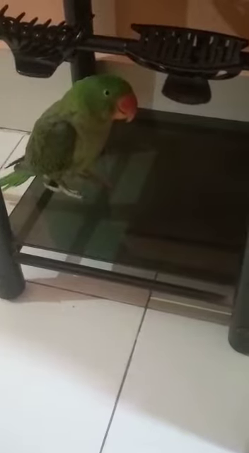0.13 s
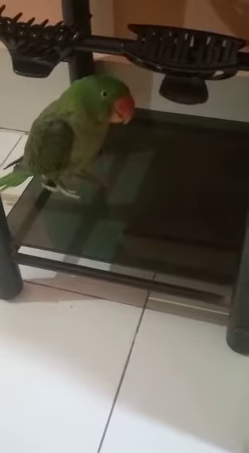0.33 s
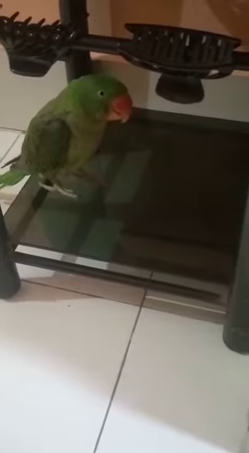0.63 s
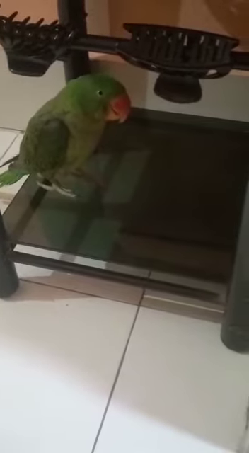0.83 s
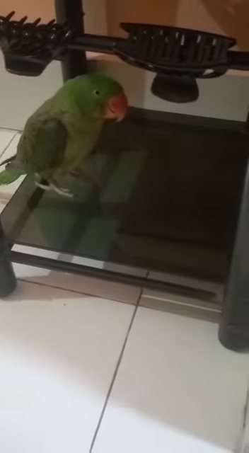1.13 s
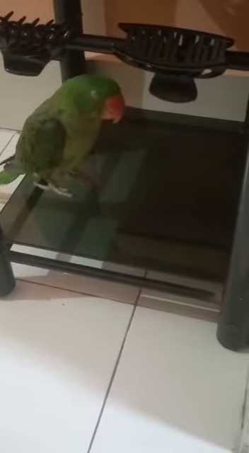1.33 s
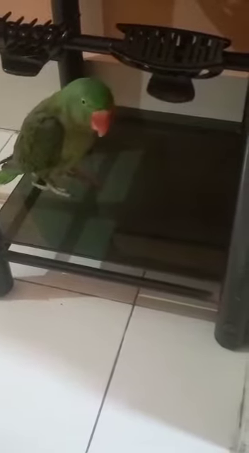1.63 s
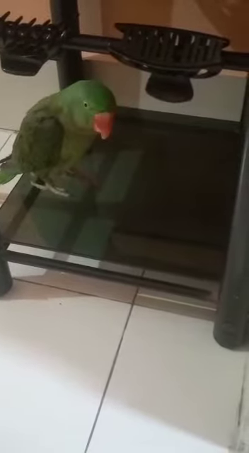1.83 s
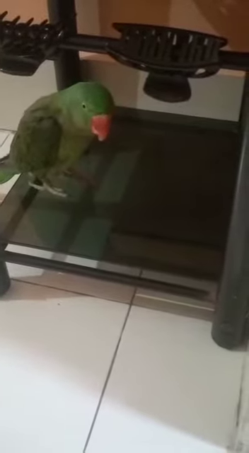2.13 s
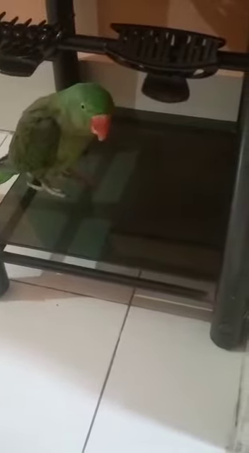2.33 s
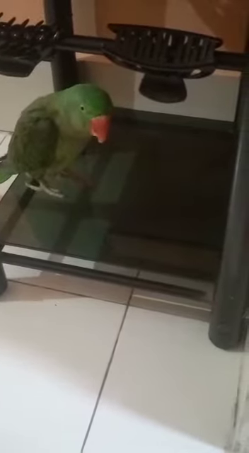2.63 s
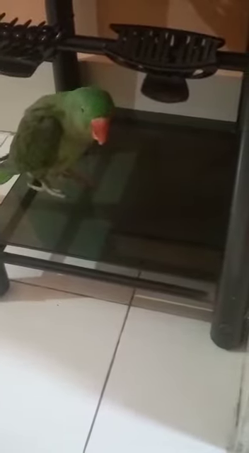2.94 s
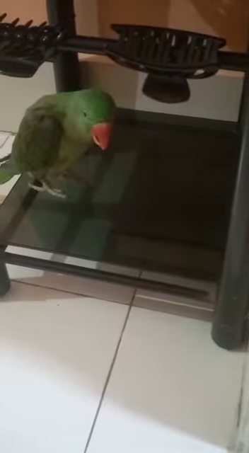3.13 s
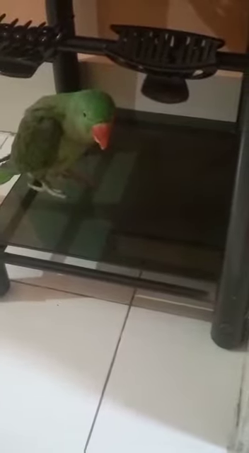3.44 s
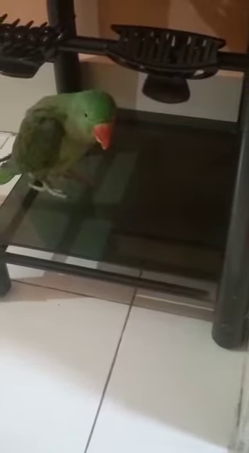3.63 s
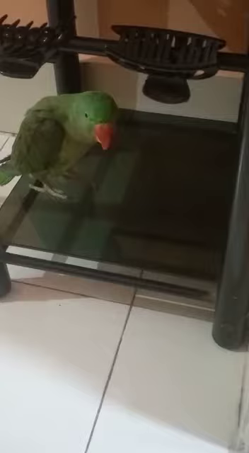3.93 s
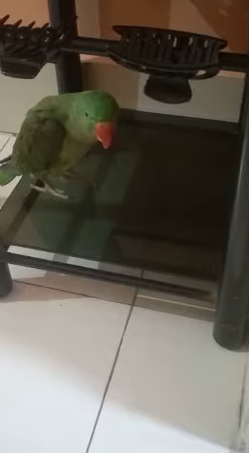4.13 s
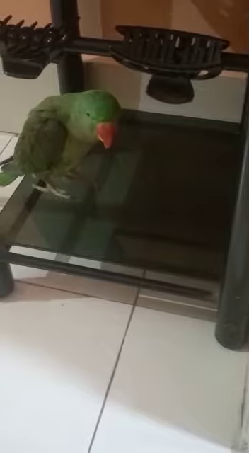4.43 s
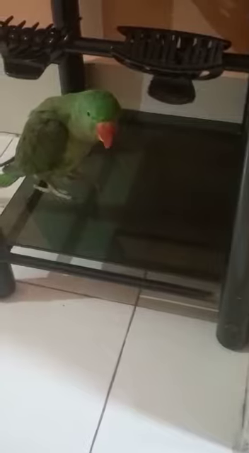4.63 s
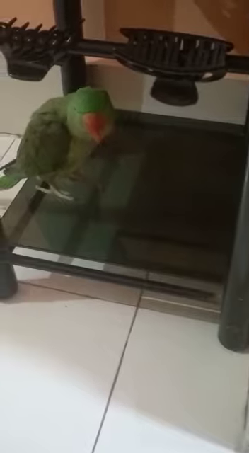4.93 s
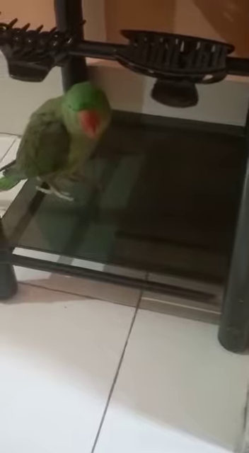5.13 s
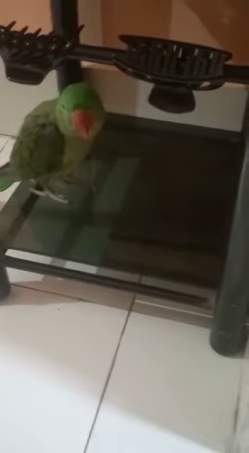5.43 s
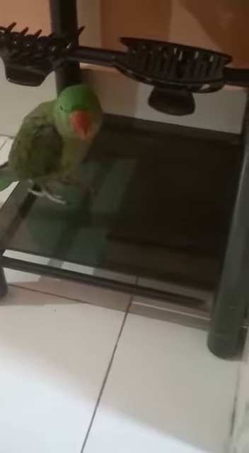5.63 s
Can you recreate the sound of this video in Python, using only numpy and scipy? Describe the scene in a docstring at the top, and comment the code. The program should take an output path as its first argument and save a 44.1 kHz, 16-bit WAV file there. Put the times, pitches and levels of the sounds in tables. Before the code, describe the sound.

A pet parakeet gives two runs of four short, harsh screeches in a small echoing tiled room, then goes quiet over faint hum.

```python
"""A small tiled room: a parakeet gives two runs of four screeches, a metre or two from a handheld phone.
Each screech is a stack of overtones that shoots up, wavers and slides down; echoes and a noise wash smear it.
Under it, sine tones make an appliance hum and faint insects outside, and filtered noise makes room air
and traffic rumble. Near the end claws tick as short rings and feathers rustle as shaped noise."""
import sys
import numpy as np
from scipy import signal
from scipy.fft import rfft, irfft, next_fast_len
from scipy.io import wavfile
from scipy.ndimage import uniform_filter1d

SR = 44100
rng = np.random.default_rng(int(sys.argv[2]) if len(sys.argv) > 2 else 0)


def pcm_store(signal):
    """Save signal as 16-bit PCM."""
    levels = np.round(np.clip(np.atleast_2d(signal), -1, 1) * 32767)
    wavfile.write(sys.argv[1], SR, levels.astype(np.int16).T)


N = 255691
TIME = np.arange(N) / SR


def undb(db):
    """Turns decibels into an amplitude factor."""
    return 10 ** (np.asarray(db) / 20)


def unit(x):
    """Scales a signal to rms 1."""
    return x / np.sqrt(np.mean(x ** 2))


def on_log(table, hz, column=1):
    """Reads a table by straight lines on a log-frequency axis."""
    table = np.array(table)
    return np.interp(np.log(np.maximum(hz, 1)), np.log(table[:, 0]), table[:, column])


def shaped(gain, count=N):
    """Noise whose spectrum follows gain(hz)."""
    size = next_fast_len(count)
    spectrum = rfft(rng.standard_normal(size))
    return irfft(spectrum * gain(np.fft.rfftfreq(size, 1 / SR)), size)[:count]


def band(hz, width_hz, count=N):
    """Noise in a bell-shaped band, rms 1; centred on 0 Hz it is a slow random control signal."""
    return unit(shaped(lambda f: np.exp(-.5 * ((f - hz) / width_hz) ** 2), count=count))


# Colour of throat, beak and microphone: [f/Hz, level/dB]
THROAT_COLOUR = [(400, -30), (620, -8), (780, -9), (1000, -15), (1300, -4), (1800, 0), (2300, 1.5),
                 (2900, 1.5), (3500, -4), (4200, -4.5), (4700, -8), (5300, 3), (6050, -9), (6600, -7),
                 (7400, -13), (8200, -24), (10500, -32), (13000, -21.5), (15500, -28.5)]
# Roughness of the voice [0-1] at start, climb, top, held note, slide and end
ROUGHNESS = (.08, .18, .1, .13, .09, .15)
START_HZ = 590
LEAP_S = .011  # from the end of the climb to the top
SAG_S, SNAP_S = .021, .005  # longest drop from the top to the held note: plain, after a crack
CRACK_AFTER_S = 0.0026  # from reaching the top to the crack
ATTACK_DB = -11.5  # the voice starts this much under its climb level
BRIGHTEN_DB = 2  # per octave, from the slide to the end
SECOND_DB = -0.5  # extra trim on the second harmonic


def screech(start_s, open_s, top_s, settled_s, slide_s, end_s, leap_hz, top_hz, settled_hz, slide_hz, end_hz,
            crack_db, climb_db, top_db, settled_db, slide_db, end_db,
            climb_fall, top_fall, settled_fall, slide_fall):
    """The syrinx drives a stack of overtones; when rough, its pitch and strength shake."""
    t = np.arange(int(start_s * SR), int(end_s * SR)) / SR
    count = len(t)
    leave_s = max(top_s, settled_s - (SNAP_S if crack_db else SAG_S))
    pitch_times = [start_s, top_s - LEAP_S, top_s, leave_s, settled_s, slide_s, end_s]
    pitches = [START_HZ, leap_hz, top_hz, top_hz, settled_hz, slide_hz, end_hz]
    hz = uniform_filter1d(np.interp(t, pitch_times, pitches), size=200)

    # level and colour reach their top values during the leap, ahead of the pitch
    stages = [start_s, open_s, top_s - 0.61 * LEAP_S, settled_s, slide_s, end_s]
    db = np.interp(t, stages, [climb_db + ATTACK_DB, climb_db, top_db, settled_db, slide_db, end_db])
    falls = [climb_fall, climb_fall, top_fall, settled_fall, slide_fall, slide_fall - BRIGHTEN_DB]
    fall_db = np.interp(t, stages, falls)
    rough = np.interp(t, stages, ROUGHNESS)

    # a slight tremor blurs the high overtones most
    tremor = (.005 + .07 * rough) * band(0, 400, count=count)
    phase = 2 * np.pi * np.cumsum(hz * (1 + tremor)) / SR
    tone = 0
    for k in range(1, 17):
        colour_db = on_log(THROAT_COLOUR, k * hz) - fall_db * np.log2(k) + (SECOND_DB if k == 2 else 0)
        colour = undb(colour_db) * (k * hz < .45 * SR)
        # each overtone flickers on its own, the higher ones more
        flicker = undb(min(1.5 * (k - 1), 4) * band(0, 70, count=count))
        # the top overtones fray into noise
        fray = np.clip(.3 * (k * hz / 1000 - 5), 0, 1.1) * band(0, 350, count=count)
        tone = tone + flicker * colour * np.sin(k * phase + k ** 2 + fray)
    tone = tone * (1 + rough * band(0, 210, count=count))

    # turbulent air in the throat
    breath = unit(shaped(lambda f: undb(on_log(THROAT_COLOUR, f)), count=count)) * undb(-27 + 24 * rough)
    # some screeches crack at the top: the voice drops until the held note
    cracked = (t > top_s + CRACK_AFTER_S) & (t < settled_s - SNAP_S / 2)
    crack = undb(uniform_filter1d(crack_db * cracked, size=150, output=float))
    edges = np.clip(np.minimum(t - t[0], t[-1] - t) / .008, 0, 1) ** 2
    return (tone * crack + breath * np.sqrt(crack)) * undb(db) * edges


# Ring of the hard walls: [f/Hz, t60/s, wash level/dB]
ROOM_RING = [(504.5, 0.49, 4), (1049.6, .45, 6), (1500, .45, -1), (2100, 0.43, 1), (3300, 0.36, 0),
             (4300, .4, 0.5), (5700, 0.38, -3), (8600, .36, 2), (14100, .3, 1.5)]
# Microphone ports, echoes off shelf, floor and table legs:
# [lag/samples, direct level/dB, [(echo t/s, level/dB against the direct sound)]]
MIC_PORTS = [(0, 0.64, [(.00097, -5), (.0031, -3), (.0052, -12.5), (.0083, -19)]), (6, -4, [(.00076, 2.5),
             (.0027, -21.5), (.0058, -24.5), (.0074, -4.5)])]


def room(x):
    """Direct sound, a few near echoes, then a dense wash that differs at the two microphone ports."""
    t = np.arange(SR // 2) / SR
    out = []
    for lag, direct_db, echoes in MIC_PORTS:
        response = np.zeros(len(t))
        for hz in 350 * 2 ** np.arange(0, 5.6, .5):  # half-octave steps
            decay = np.exp(-np.log(1000) * t / on_log(ROOM_RING, hz))
            wash = shaped(lambda f: np.exp(-2 * (np.log2((f + 1) / hz) / .5) ** 2), count=len(t))
            level = undb(on_log(ROOM_RING, hz, column=2))
            response += wash * decay / np.sqrt(np.sum(decay ** 2)) * level
        response *= 1 - np.exp(-t / 0.0023)  # the wash builds up
        for s, db in [(0.00055, 0.0061)] + echoes:  # direct sound first
            response[int(lag + s * SR)] += undb(direct_db + db)
        out.append(signal.fftconvolve(x, response)[:len(x)])
    return np.array(out)


# Each screech climbs, leaps to its top, settles on a held note and slides down:
# [start t/s, voice open t/s, top t/s, settled t/s, slide t/s, end t/s,
#  before the leap f/Hz, top f/Hz, settled f/Hz, slide f/Hz, end f/Hz, crack level/dB,
#  climb level/dB, top level/dB, settled level/dB, slide level/dB, end level/dB,
#  fall of the overtones in dB per octave: climb, top, settled, slide]
SCREECH_RUNS = [ (-.045, -.033, -.004, .032, .072, .117, 1500, 2630, 2310, 2410, 1380, 0, -31.5, -28.5, -32, -32, -29.5, -0.5, 5, 2, 4),
                (.244, .265, .278, .31, .352, .402, 1420, 2780, 2330, 2300, 1330, 0, -26, -35.5, -27, -25, -35.5, 3, -1.5, 5.5, 4.5),
                (.533, .543, .57, .597, .632, .683, 1650, 2760, 2090, 2090, 1470, -14, -30.5, -25.5, -27, -25, -31.5, 4, 4.5, 1.5, 2.5),
                (.833, .849, .867, .905, .93, .989, 1600, 2830, 2240, 2240, 1420, -20, -23, -33.5, -23.5, -23, -34.5, 4.5, -1.5, 12.5, 2),
                (2.97, 2.981, 3.005, 3.072, 3.1, 3.133, 1430, 2480, 2330, 2050, 1310, -26, -26.5, -30.5, -25, -19, -35.5, 12, 3.5, 6.5, 1),
                (3.279, 3.3, 3.315, 3.34, 3.376, 3.45, 1800, 2460, 2180, 2050, 1240, 0, -28.5, -20, -26, -20.5, -35, 5, 2, 16.5, 4.5),
                (3.586, 3.606, 3.624, 3.655, 3.685, 3.76, 1700, 2420, 1930, 1930, 1320, 0, -25.5, -25, -25, -27, -43, 11.5, -0.5, 4, 3),
                (3.89, 3.905, 3.935, 3.957, 3.99, 4.036, 1460, 2240, 1780, 1770, 1370, 0, -28, -22.5, -28.5, -29.5, -38, 7.5, 4.5, 2, 3)]
LEAD_S = .06  # the first screech is under way before time zero


def parakeet():
    """All screeches on one line, heard through the room."""
    lead = int(LEAD_S * SR)
    out = np.zeros(N + lead)
    for row in SCREECH_RUNS:
        sound = screech(*row)
        start = lead + int(row[0] * SR)
        out[start:start + len(sound)] += sound
    return room(out)[:, lead:]


# Stereo width of noise: [f/Hz, left-right likeness 0-1]
STEREO_LIKENESS = [(60, 1), (130, 0.8), (290, 0.62), (640, 0.8), (1410, 0.31), (3100, 0), (6820, 0),
                   (15000, 0)]
# Stereo lean of noise: [f/Hz, left minus right level/dB]
STEREO_LEAN = [(60, 0.5), (110, -0.5), (200, -3), (380, -4), (700, 4), (1290, -1), (2380, 0.5), (4400, 2),
               (8120, 3.5), (15000, -1.5)]


def stereo_noise(gain):
    """Shaped noise, rms 1 over both sides: mid and side set how alike they are, then each band leans."""
    like = lambda f: np.clip(on_log(STEREO_LIKENESS, f), 0, 1)
    mid = shaped(lambda f: gain(f) * np.sqrt(1 + like(f)))
    side = shaped(lambda f: gain(f) * np.sqrt(1 - like(f)))
    size = 2 * next_fast_len(N // 2 + 1)
    lean_db = np.outer([.5, -.5], on_log(STEREO_LEAN, np.fft.rfftfreq(size, 1 / SR)))
    pair = np.array([mid + side, mid - side])
    return unit(irfft(rfft(pair, size) * undb(lean_db), size)[:, :N])


# Spectrum shape of air and rumble: [f/Hz, relative level/dB per Hz]
AIR_COLOUR = [(15, -77), (25, -35), (91, -12), (169, -14.5), (240, -15.5), (314, -21.5), (349, -13),
              (422, -30), (496, -23.5), (615, -37.5), (3730, -44.5), (4760, -43), (8370, -41.5),
              (9570, -45), (15500, -45.5)]
# Low rumble, 70 to 160 Hz, before its quick swells: [t/s, level/dB]
RUMBLE_LEVEL = [(0.0, -62), (0.48, -60), (0.51, -78), (0.61, -58.5), (1.47, -61.5), (1.89, -72), (2.2, -55),
                (2.52, -66), (3.81, -62.5), (3.84, -74.5), (4.34, -67.5), (5.8, -71)]
# Deepest part of the rumble, 42 to 70 Hz: [t/s, level/dB]
DEEP_LEVEL = [(0.0, -71), (1.1, -73), (1.26, -77.5), (1.97, -80.5), (2.18, -77), (4.23, -80), (4.52, -72.5),
              (5.25, -76), (5.8, -84)]
# Hum lines and thin insect-like tones: [f/Hz, wander/Hz rms, mean level/dB rms, left minus right level/dB]
HUM_AND_INSECTS = [(193.8, 6, -76, 0), (344.5, .5, -72, -7), (393, .5, -74, -7), (498, 4, -90, 0),
                   (4867, 12, -94, 4), (6385, 25, -98, 4), (7569, 15, -99, 4), (7811, 15, -98, 4),
                   (8107, 10, -97, 4), (8204, 10, -97, 4), (8549, 5, -89, 4), (9044, 8, -98, 4)]
AIR_DB = -68
RUMBLE_HZ, RUMBLE_WIDTH_HZ, RUMBLE_PEAK_DB = 90, 6, 6
RUMBLE_SWELL_DB, RUMBLE_SWELL_HZ = 0.5, 6.6  # quicker random swells


def background():
    """Steady room air and swelling low noise, with hum and insect sines that waver in pitch and level."""
    colour = lambda f: on_log(AIR_COLOUR, f)
    air = stereo_noise(lambda f: undb(colour(f)) * (f > 160)) * undb(AIR_DB)
    boom = lambda f: RUMBLE_PEAK_DB * np.exp(-.5 * ((f - RUMBLE_HZ) / RUMBLE_WIDTH_HZ) ** 2)
    rumble = stereo_noise(lambda f: undb(colour(f) + boom(f)) * (f <= 160) * (f > 70))
    rumble_db = np.interp(TIME, *np.transpose(RUMBLE_LEVEL)) + RUMBLE_SWELL_DB * band(0, RUMBLE_SWELL_HZ)
    deep = stereo_noise(lambda f: undb(colour(f)) * (f <= 70) * (f > 42))
    deep_db = np.interp(TIME, *np.transpose(DEEP_LEVEL))
    out = air + deep * undb(deep_db) + rumble * undb(rumble_db)

    for hz, wander_hz, mean_db, pan_db in HUM_AND_INSECTS:
        waver = np.cumsum(wander_hz * band(0, 12)) / SR
        drift = np.interp(TIME, np.linspace(0, N / SR, 40), rng.standard_normal(40))
        db = mean_db + 1.5 * drift
        for side, sign in enumerate((1, -1)):
            # the two ports hear each tone slightly out of step
            tone = np.sin(2 * np.pi * (hz * TIME + waver) + sign * hz / 700)
            out[side] += np.sqrt(2) * undb(db + sign * pan_db / 2) * tone
    return out


# Claw ticks: [t/s, level/dB, f/Hz, t60/s]
CLAW_TICKS = [(4.555, -62, 1700, .004), (4.622, -64, 1900, .005), (5.066, -54, 355, 0.018),
              (5.548, -53, 378, 0.024), (5.654, -36, 2400, 0.0038)]
# Feather rustle: [t/s, level/dB]
RUSTLE_LEVEL = [(5.66, -80), (5.674, -67), (5.73, -66.5), (5.79, -69), (5.798, -72)]
# Spectrum shape of the feathers: [f/Hz, relative level/dB per Hz]
FEATHER_COLOUR = [(710, -51), (1200, -12.5), (2570, -0.5), (4400, -13), (5980, -4.5), (7310, -9.5),
                  (13600, -26.5), (15000, -22)]


def small_noises():
    """Claws tick on the shelf as dying rings, then feathers rustle as noise with a random flutter."""
    out = np.zeros((2, N))
    for s, db, hz, t60 in CLAW_TICKS:
        t = np.maximum(TIME - s, 0)
        # a short ring with an overtone a fifth above
        ring = np.sin(2 * np.pi * hz * t) + 0.24 * np.sin(2 * np.pi * 1.5 * hz * t)
        touch = 1 - np.exp(-3 * hz * t)  # the contact lasts part of a cycle
        out += undb(db) * touch * ring * np.exp(-np.log(1000) * t / t60)
    s, db = np.transpose(RUSTLE_LEVEL)
    feathers = stereo_noise(lambda f: undb(on_log(FEATHER_COLOUR, f))) * undb(1.5 * band(0, 43))
    return out + feathers * undb(np.interp(TIME, s, db, left=-140))


def scene():
    """The bird, its small noises and the background together."""
    return parakeet() + small_noises() + background()


TOP_HZ = 15700


def record(dry):
    """The phone cuts the top with a steep low-pass."""
    return signal.sosfilt(signal.ellip(10, .2, 80, TOP_HZ, fs=SR, output="sos"), dry)


dry = scene()
out = record(dry)
pcm_store(out)
```